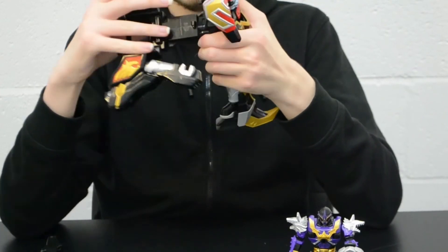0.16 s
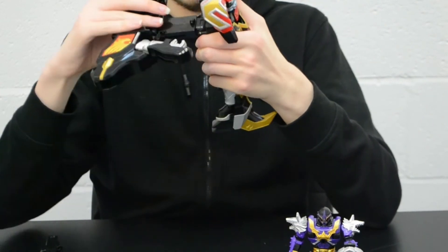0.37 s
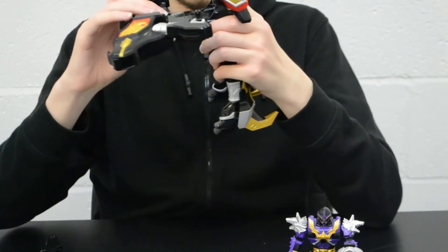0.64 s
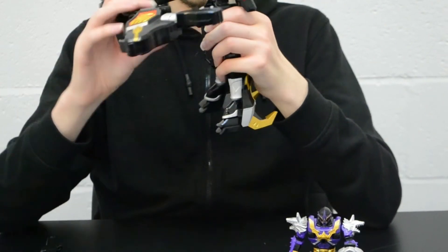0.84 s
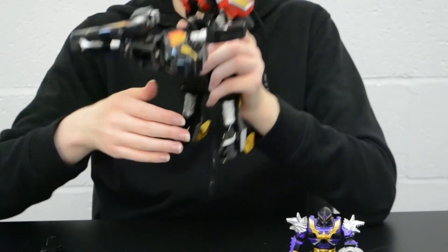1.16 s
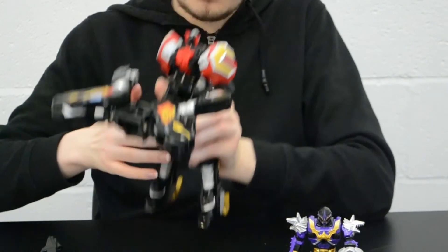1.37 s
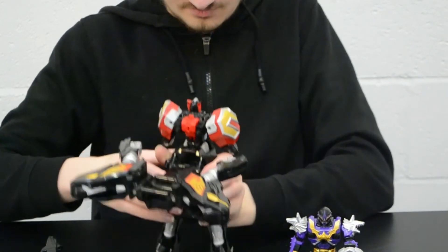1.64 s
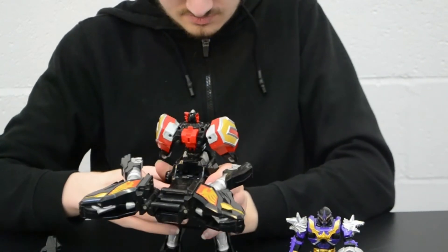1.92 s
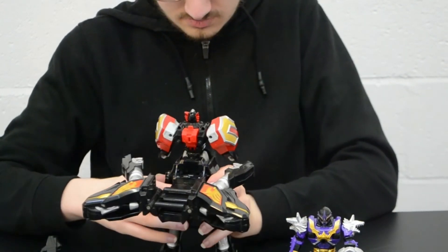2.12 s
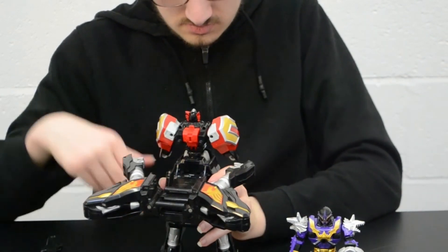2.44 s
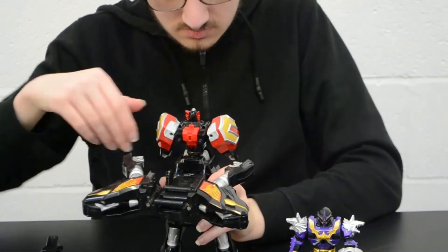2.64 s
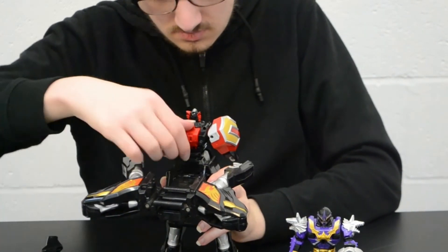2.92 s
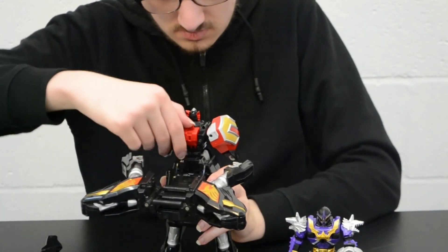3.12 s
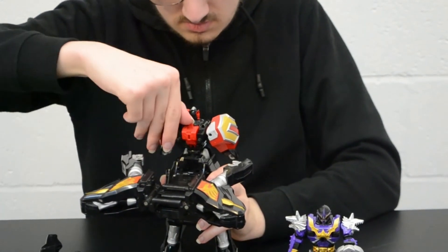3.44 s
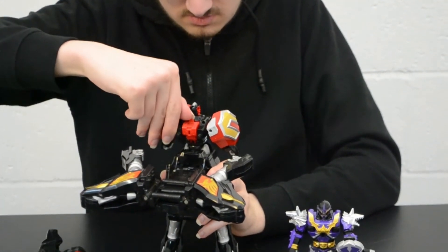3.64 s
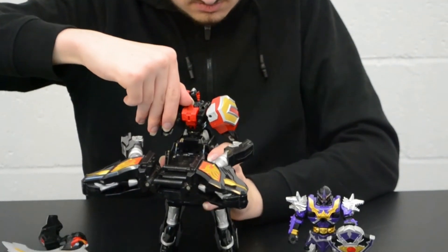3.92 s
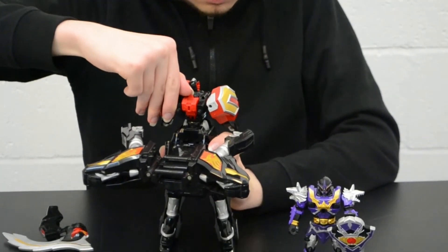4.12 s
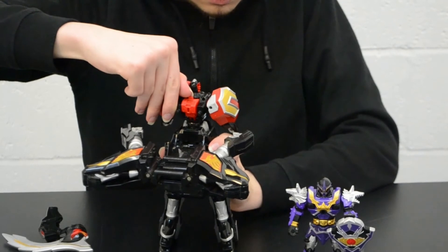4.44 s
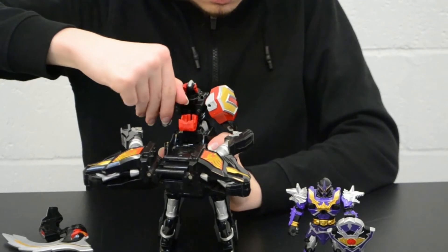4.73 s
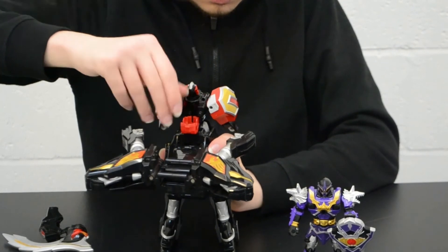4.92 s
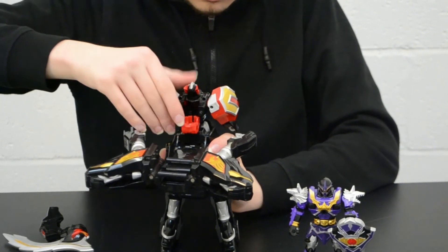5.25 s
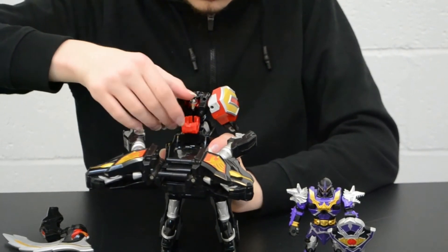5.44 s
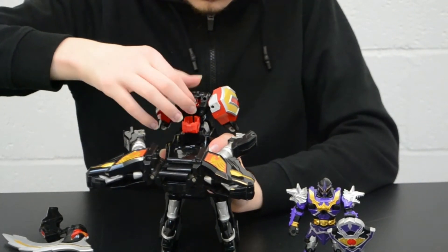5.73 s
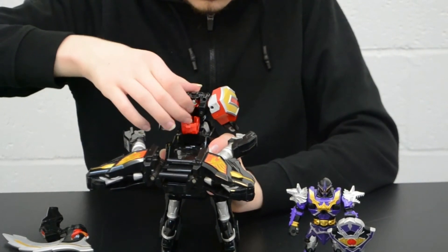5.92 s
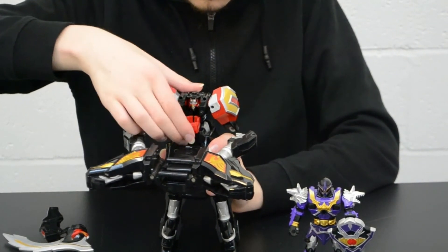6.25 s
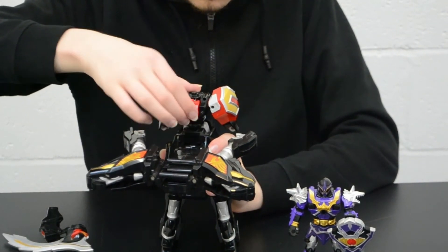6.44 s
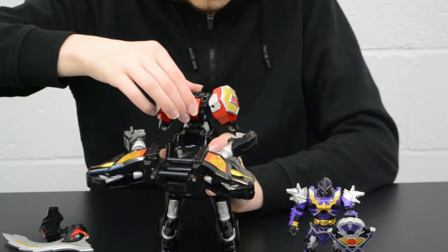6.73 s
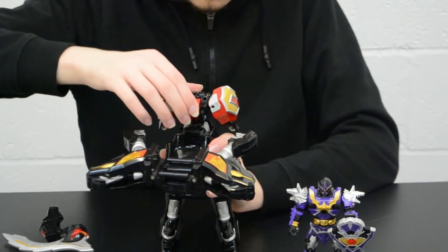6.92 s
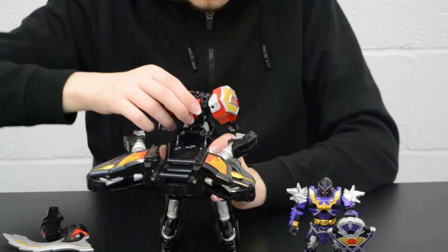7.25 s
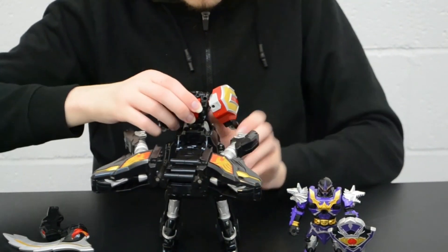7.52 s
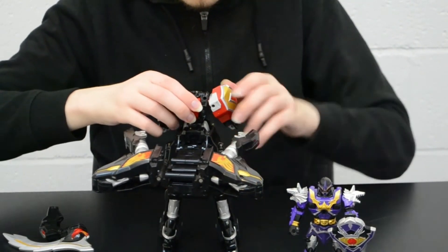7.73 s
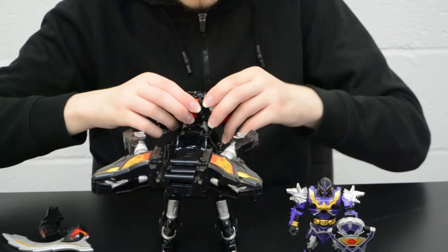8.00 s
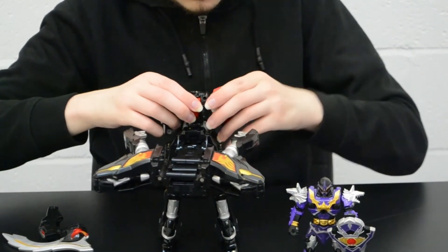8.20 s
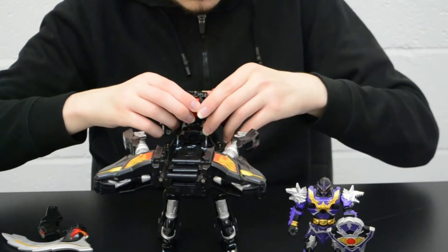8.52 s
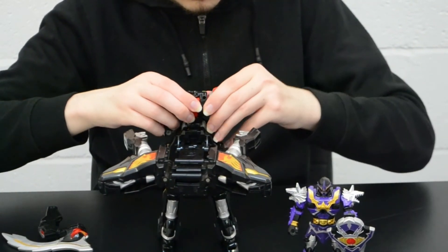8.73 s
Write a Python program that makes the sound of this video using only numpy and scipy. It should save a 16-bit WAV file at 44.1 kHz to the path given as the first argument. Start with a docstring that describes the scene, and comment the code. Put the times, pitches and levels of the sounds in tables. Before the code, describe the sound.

Plastic toy joints tick and rub as hands reshape a robot, with a table knock and two loud snaps in a bare room.

```python
"""A hollow plastic toy robot is folded into a new shape by hand, at a table in a bare, hard-walled room.
Its stiff hinge scrapes in tiny jerks, its feet land on the table and set low notes of the room ringing,
a shoulder piece flips over and a latch snaps home. In between, joints tick, fingers tap the shells,
and plastic and sleeves rub. The table and walls echo every click, over quiet ventilation."""
import sys
import numpy as np
from scipy import signal
from scipy.fft import rfft, irfft, next_fast_len
from scipy.io import wavfile
from scipy.ndimage import uniform_filter1d

SR = 44100
rng = np.random.default_rng(int(sys.argv[2]) if len(sys.argv) > 2 else 0)


def dump_mix(stems):
    """Bounce the given channels to the path in sys.argv[1] as a 16-bit WAV at rate SR."""
    frames = np.atleast_2d(stems).T  # one column per channel
    limited = np.clip(frames, -1, 1)  # hard clip at full scale
    pcm = np.round(limited * 32767).astype(np.int16)
    wavfile.write(sys.argv[1], SR, pcm)


N = 391166
HIT_SAMPLES = 4096
HIT_TIME = np.arange(HIT_SAMPLES) / SR  # seconds since a hit began

# Levels in the tables are relative. A "tone" says how strong each frequency is.
# Tone of the ventilation: f/Hz, level/dB
VENT_TONE = [(20, -20), (50, 6.5), (80, -8), (110, -1.5), (170, -5), (300, -2.5), (650, 0.5), (1200, -2.5),
             (3000, -9.5), (6000, -19), (10000, -32.5), (12000, -29)]
# How long the room's echo takes to fade by 60 dB: f/Hz, fade/s
ECHO_FADE = [(100, 0.304), (400, 0.46), (1500, 0.43), (3000, 0.37), (6000, 0.351), (12000, 0.23)]
# Tone of that echo, with uneven bass: f/Hz, level/dB
ECHO_TONE = [(180, -4.5), (230, 5.5), (260, 1), (292, 8), (340, 0), (400, 0), (455, 9), (520, 3),
             (3200, 2.5), (5000, -2.5), (6500, -1), (10000, -2)]
# Tone of the microphone: f/Hz, level/dB
MIC_TONE = [(20, -15), (70, -16.5), (110, -1.5), (10500, 1.5), (11400, -9), (12200, -37.5), (13500, -4),
            (15000, -11)]
# Tone of brushing sleeves: f/Hz, level/dB
SLEEVE_TONE = [(60, -21), (110, -23), (170, -8), (215, -3.5), (450, 0), (800, -1), (1200, -3.5),
               (2500, -1.5), (6000, -51.5), (11000, -52)]
# Hand moves that rub the parts: t/s, length/s, level/dB
HAND_MOVES = [(0, 0.032, -56), (0.156, 0.34, -57.5), (.63, 0.042, -59), (1.18, 0.426, -63.5),
              (1.94, 0.03, -47), (2.097, 0.217, -57), (2.549, 0.23, -53), (3.003, 0.11, -61),
              (3.502, 0.96, -58.5), (4.377, 0.135, -54.5), (4.743, 0.31, -54.5), (5.32, .05, -63),
              (5.56, 0.52, -61), (6.157, 0.061, -52.5), (6.474, 0.48, -53.5), (7.096, 0.49, -59),
              (7.988, .23, -55.5), (8.527, .34, -60.5)]
# Soft knocks on hollow shells: t/s, level/dB, cavity f/Hz, thud/dB
SHELL_TAPS = [(0.0941, -9, 1400, -24), (0.329, -9, 1290, -24), (1.117, -20, 2420, -10),
              (1.214, -20, 1110, -23), (1.329, -26, 1070, -19), (1.515, -19, 1670, -15.5),
              (1.7924, -15, 1110, -24), (3.0179, -14.5, 1680, -2), (3.022, -13.5, 1050, -2.5),
              (3.5335, -10.5, 1190, -6), (3.537, -12.5, 2380, -8), (4.577, -25.5, 1470, -7),
              (5.34, -29, 795, 7), (5.694, -14, 1160, -1.5), (6.0487, -13, 1160, -5.5),
              (6.161, -22.5, 1190, -2), (7.312, -14, 1050, -6.5)]
# Thin tabs slipping free: t/s, level/dB, f/Hz, fade/s
TAB_TWANGS = [(6.157, -33, 8340, 0.041), (8.037, -26, 2400, 0.011)]
# Turns of the stiff hinge: t/s, length/s, level/dB, starting cavity f/Hz
HINGE_TURNS = [(0.153, .066, -18, 1314), (0.334, .1, -26.5, 1550)]
# Tone of a small plastic tick: f/Hz, level/dB
TICK_TONE = [(60, -40.5), (170, -27.5), (260, -10), (800, -7.5), (1300, -3), (2600, 2), (3800, 0),
             (4700, 0.5), (5500, -8.5), (6200, -6), (7900, -13.5), (9300, -12), (11000, -30)]
# Ticks of joints and loose parts: t/s, level/dB, hollow body/dB, sharp edge/dB
JOINT_TICKS = [(0.0742, -34, 11.5, -4), (0.0944, -14.5, 5, 0), (0.148, -11, 4, 2), (0.2535, -12.5, 2.5, 2),
               (0.3266, -9, 2.5, 5.5), (0.659, -27.5, 7, 9), (1.05, -26, 5, -7), (1.117, -28, 2, 3),
               (1.329, -21.5, 5.5, 5), (1.516, -19, 5, 7), (1.7926, -12, 6, 7.5), (1.981, -9.5, -3, 1.5),
               (2.0425, -17, 2, -2), (2.0884, -11, 3, 0), (2.149, -12.5, -3, -3.5), (2.1814, -22, -2, -3),
               (2.2495, -18.5, -1, -8), (2.3171, -20, 1, -9), (2.5137, -23, -2, -2), (2.574, -23, -2, 3.5),
               (2.607, -15.5, 2.5, -3.5), (2.6523, -18, 5, -2), (2.7362, -9, -7.5, -1),
               (2.762, -13.5, 1.5, 0), (2.8202, -10.5, -6.5, -1), (2.829, -20, -1.5, -7),
               (3.0885, -21.5, 3, -5), (3.1952, -11, -0.5, 0), (3.259, -14, -4, -0.5), (3.274, -11, 1.5, 1),
               (3.3946, -12, -2, -1), (3.5333, -27.5, -2.5, 3), (3.599, -8, -10, -4),
               (3.6167, -15, 0.5, -1), (3.8632, -27, -1, 9), (3.8923, -11, -6.5, 5),
               (3.9031, -6, -0.5, -2.5), (4.0195, -16.5, 4.5, 2.5), (4.1211, -15, 5.5, 5.5),
               (4.3657, -21.5, 11.5, 11.5), (4.3844, -12.5, 2, 3.5), (4.82, -7.5, -1, 0),
               (4.8493, -15, -13.5, 5), (4.8882, -14.5, -2, 5), (4.9371, -6.5, -0.5, -1.5),
               (4.983, -13, -3, 1), (5.0471, -10.5, -1, -2), (5.444, -10.5, -1, -3), (5.5852, -24, 8, -6),
               (5.7259, -11, 0, -1), (5.981, -13.5, 3.5, 3), (6.1648, -10.5, 4.5, 2.5),
               (6.2535, -19.5, 3, -4.5), (6.2964, -9.5, 1, 0), (6.4531, -10, -0.5, 0),
               (6.5017, -13.5, 4, -8), (6.5345, -8.5, -1, -4), (6.5561, -12, -8.5, 0.5),
               (6.6349, -18.5, 0, -1), (6.6803, -14.5, 6, -5), (6.9384, -15.5, -1.5, 2),
               (7.0498, -5, -3, 0.5), (7.085, -11.5, 0.5, 1), (7.152, -17.5, 1, -1),
               (7.1857, -11.5, -2, -0.5), (7.207, -21.5, 3, 4), (7.2776, -21.5, 5.5, -2),
               (7.3118, -19.5, 2, 0.5), (7.402, -25.5, -3, 3), (7.72, -23.5, -3.5, 6),
               (7.9544, -20.5, 0.5, 3), (8.0365, -23.5, -3.5, 12), (8.152, -8.5, -9.5, 13.5),
               (8.329, -22, 0, -2), (8.4815, -25, 2, -9), (8.522, -26, -3, -2), (8.6974, -9.5, -4, 2),
               (8.822, -15, 0, 19)]
# Resonances (ringing notes) that each kind of hit sets off: f/Hz, fade/s, level/dB
# Those under "feet" are low resonances of the room, ringing when the feet land on the table.
RESONANCES = {"tick": [(1185, 0.047, -20.5), (2790, 0.002, -20), (5260, 0.0069, -13)],
              "feet": [(460, 0.036, -5.5), (683, 0.062, -8), (990, 0.058, -15), (1380, 0.049, -17),
              (1463, 0.026, 0.5)], "shoulder": [(1216, 0.054, -17.5), (2370, 0.012, -7.5)],
              "latch": [(2240, 0.05, -35.5), (2656, 0.071, -16), (2730, 0.044, -14), (2810, .04, -18.5),
              (4740, .018, -18)]}
# Tone of each kind of blow: f/Hz, level/dB
BLOW_TONES = {"feet": [(50, -49), (75, -34.5), (110, -6), (170, -22), (330, -14), (420, 0.5), (560, 11.5),
              (690, 9.5), (830, 4.5), (1050, 8.5), (1500, 10), (2000, 5.5), (2500, 0), (4500, -6),
              (9000, -15), (11000, -28)], "shoulder": [(50, -54), (110, -30), (190, -21), (280, -10.5),
              (450, -6), (850, -7.5), (1400, 0), (2500, -4), (3800, -4), (5300, -2), (7800, -18),
              (9400, -14.5), (11000, -27)], "latch": [(50, -48), (110, -12), (170, -23), (290, -13.5),
              (450, -16.5), (700, -8.5), (1800, -7), (2600, 5), (3150, 1), (3900, -9.5), (4800, -0.5),
              (5800, -13.5), (7800, -13.5), (9400, -6), (11000, -24.5)]}
# Blows of landing and snapping home: t/s, level/dB, hardness/(dB per octave), kind
BLOWS = [(1.8320, -8.5, -0.5, "feet"), (1.8344, -3.5, 1, "feet"), (1.8387, -2.5, 0, "feet"),
         (1.842, -14.5, -1.5, "feet"), (1.866, -9.5, 3, "feet"), (4.6239, -10, 1.5, "shoulder"),
         (4.6285, 0.5, -1, "shoulder"), (4.6301, 1, 0.5, "shoulder"), (4.638, -12.5, -7.5, "shoulder"),
         (4.649, 6, 4, "shoulder"), (4.6521, 4, -1.5, "shoulder"), (4.670, -9.5, -3, "shoulder"),
         (6.7318, -28, -8, "latch"), (6.7353, 8, 0.5, "latch"), (6.738, -3.5, -3, "latch")]


def gain(db):
    """Turn decibels into a number to multiply by."""
    return 10 ** (np.asarray(db) / 20)


def curve_at(points, hz):
    """Read a curve of (f/Hz, value) points, with octaves evenly spaced."""
    point_hz, values = np.transpose(points)
    return np.interp(np.log(hz + 1), np.log(point_hz), values)


def freqs(size=HIT_SAMPLES):
    """List the frequencies in the spectrum of this many samples."""
    return np.arange(size // 2 + 1) * SR / size


def unit_energy(x):
    """Scale a sound to an energy of one."""
    return x / np.sqrt(np.sum(x ** 2))


def filter_long(x, tone):
    """Give a long sound a tone."""
    size = next_fast_len(len(x), True)
    return irfft(rfft(x, size) * gain(curve_at(tone, freqs(size))), size)[:len(x)]


def filter_hit(x, db):
    """Filter a short sound by a dB curve so that nothing comes before its start."""
    cepstrum, half = irfft(np.log(gain(db))), len(x) // 2
    cepstrum[1:half] *= 2
    cepstrum[half + 1:] = 0
    return irfft(rfft(x) * np.exp(rfft(cepstrum)))


def flatten(x, bins):
    """Even out a burst's spectrum so that no chance pitch stands out."""
    power = uniform_filter1d(np.abs(rfft(x)) ** 2, size=bins)
    return filter_hit(x, -10 * np.log10(power + 1e-12))


def add(track, start_s, sound):
    """Mix a hit into the track."""
    start = int(np.clip(start_s * SR, 0, N - 1))
    track[start:start + HIT_SAMPLES] += sound[:N - start]


def fade(t, fade_s):
    """Die away, falling 60 dB in fade_s seconds."""
    return np.exp(-np.log(1000) * t / fade_s)


def note(hz, fade_s):
    """One vibration starts from rest and dies away."""
    return unit_energy(np.sin(2 * np.pi * hz * HIT_TIME) * fade(HIT_TIME, fade_s))


def ventilation():
    """Moving air makes a quiet, steady rush."""
    rush = unit_energy(filter_long(rng.standard_normal(N), VENT_TONE))
    return gain(-68.5) * np.sqrt(N) * rush


def room(x, table_s, table_db, wall_db, build_s):
    """The table adds one quick echo; the bare walls add a wash of echoes whose treble dies first."""
    t, hz = np.arange(SR) / SR, freqs(SR)
    spectrum = rfft(rng.standard_normal(SR))
    edges_hz = [0, 250, 700, 2000, 4000, 6000, 8000, SR]
    tail = np.zeros(SR)
    for low, high in zip(edges_hz, edges_hz[1:]):
        band = irfft(spectrum * ((hz >= low) & (hz < high)))
        tail += band * fade(t, curve_at(ECHO_FADE, min((low + high) / 2, SR / 4)))
    tail = flatten(tail * (1 - np.exp(-t / build_s)), bins=24)
    response = gain(wall_db) * filter_hit(tail, curve_at(ECHO_TONE, hz))
    response[0] += 1  # the direct sound
    response[int(table_s * SR)] += gain(table_db)
    return signal.fftconvolve(x, response)[:N]


def contact(crack_s, shell_s, shell_db):
    """Plastic meets plastic: a bright crack, then a brief, deeper chatter of the shell."""
    crack, shell = rng.standard_normal((2, HIT_SAMPLES))
    bass_cut_db = curve_at([(1200, -8), (4500, 0)], freqs())
    crack = filter_hit(crack * fade(HIT_TIME, crack_s) * HIT_TIME, bass_cut_db)
    shell = shell * fade(HIT_TIME, shell_s)
    return flatten(unit_energy(crack) + gain(shell_db) * unit_energy(shell), bins=25)


def ring(notes, detune, scatter_db):
    """Resonances ring and fade, a little different in pitch and strength at each hit."""
    chance = rng.standard_normal((len(notes), 2))
    return sum(gain(db + scatter_db * louder) * note(hz * (1 + detune * higher), fade_s)
               for (hz, fade_s, db), (louder, higher) in zip(notes, chance))


def knock(hz, thud_db):
    """A soft hit sounds the cavity (the air inside a shell) over a dull thud of its body."""
    tone = [(100, -32), (250, thud_db), (0.82 * hz, thud_db), (hz, 4),
            (1.47 * hz, -3), (1.78 * hz, -6), (8000, -27), (11000, -42)]
    return filter_hit(contact(crack_s=0.022, shell_s=0.045, shell_db=1.0), curve_at(tone, freqs()))


def hand_effort(rise_s=0.073, fall_s=0.14, grip_db=-71.5):
    """Each hand move swells, holds and lets go, over a light, steady grip."""
    t = np.arange(N) / SR
    moves = [gain(db) * np.interp(t, [s - rise_s, s, s + length, s + length + fall_s], [0, 1, 1, 0])
             for s, length, db in HAND_MOVES]
    return np.maximum(np.max(moves, axis=0), gain(grip_db))


def rubbing(slips_per_s=110):
    """Sliding plastic catches and slips in tiny, uneven grains while the sleeves brush along."""
    slips = (rng.random(N) < slips_per_s / SR) * rng.choice([-1, 1], N)
    strengths = gain(5.9 * np.minimum(rng.exponential(size=N), 3))
    grain = contact(crack_s=0.0035, shell_s=0.024, shell_db=-6.5)
    grains = signal.fftconvolve(slips * strengths, grain)[:N]
    plastic = unit_energy(filter_long(grains, TICK_TONE))
    cloth = unit_energy(filter_long(rng.standard_normal(N), SLEEVE_TONE))
    return hand_effort() * np.sqrt(N) * (gain(-11) * plastic + gain(-12.5) * cloth)


def twangs():
    """Thin tabs twang as they slip free."""
    out = np.zeros(N)
    for start_s, db, hz, fade_s in TAB_TWANGS:
        add(out, start_s, gain(db) * note(hz, fade_s))
    return out


def taps():
    """Fingers and parts knock on the hollow shells."""
    out = np.zeros(N)
    for start_s, db, hz, thud_db in SHELL_TAPS:
        add(out, start_s, gain(db) * knock(hz, thud_db))
    return out


def hinge(slips_per_s=180, fall_octaves_per_s=5.7):
    """The hinge sticks and slips; each jerk rings a cavity whose pitch falls as the hinge turns."""
    out = np.zeros(N)
    for start_s, length, db, start_hz in HINGE_TURNS:
        for age in np.arange(0, length, 1 / slips_per_s):
            late, louder = rng.standard_normal(2)
            hz = start_hz * 2 ** (-fall_octaves_per_s * age)
            jerk = knock(hz, thud_db=-30)
            jerk += ring([(hz, 0.034, -15.5)], detune=0.071, scatter_db=1)
            add(out, start_s + age + 0.0015 * late, gain(db + 2 * louder) * jerk)
    return out


def ticks(lands_s=1.83):
    """Small, hard hits shake the toy's body and thin edges; they thud only once it is on the table."""
    out, hz = np.zeros(N), freqs()
    for start_s, db, body_db, edge_db in JOINT_TICKS:
        hit = contact(crack_s=0.006, shell_s=0.051, shell_db=-3.5)
        tick = filter_hit(hit, curve_at(TICK_TONE, hz))
        tick += ring(RESONANCES["tick"], detune=0.024, scatter_db=3)
        thud_db = body_db + (-29 if start_s < lands_s else 3)
        tone = [(600, thud_db), (1000, body_db), (1600, body_db),
                (2300, 0.0024), (5500, 0.011), (7500, edge_db)]
        add(out, start_s, gain(db) * filter_hit(tick, curve_at(tone, hz)))
    return out * gain(-2.0)


def snaps():
    """The feet, shoulder and latch each hit home in a quick run of blows; harder blows are brighter."""
    out, hz = np.zeros(N), freqs()
    octaves = np.log2(np.clip(hz, 300, 7000) / 3000)
    for start_s, db, hardness, kind in BLOWS:
        hit = contact(crack_s=0.0048, shell_s=0.039, shell_db=-10.5)
        blow = filter_hit(hit, curve_at(BLOW_TONES[kind], hz))
        blow += gain(-8.5) * ring(RESONANCES[kind], detune=0.012, scatter_db=2)
        add(out, start_s, gain(db) * filter_hit(blow, hardness * octaves))
    return out


def scene():
    """The toy is folded in its room, over quiet ventilation."""
    handling = ticks() + taps() + twangs() + snaps() + rubbing()
    air = ventilation()
    toy = room(handling + hinge(), table_s=0.003, table_db=-5.5, wall_db=1.73, build_s=0.009)
    return (toy + air)[None]


def record(dry):
    """A small microphone weakens the deep bass, has a dip in the high treble and cuts off the very top."""
    top_cut = signal.ellip(8, 0.2, 70, 15800, fs=SR, output="sos")
    return signal.sosfilt(top_cut, filter_long(dry[0], MIC_TONE))[None]


dry = scene()
out = record(dry)
dump_mix(out)
```